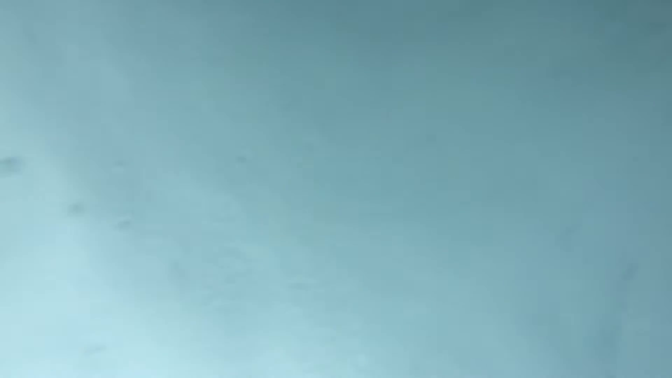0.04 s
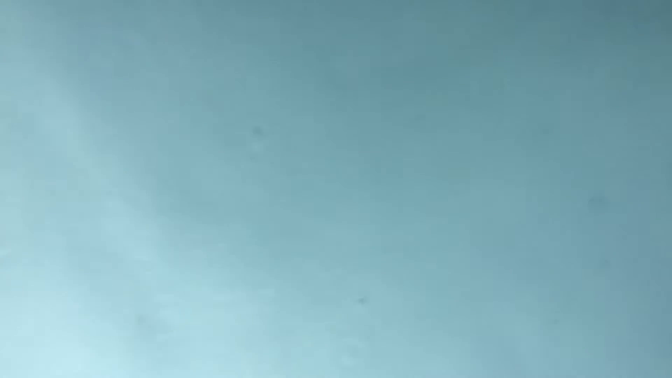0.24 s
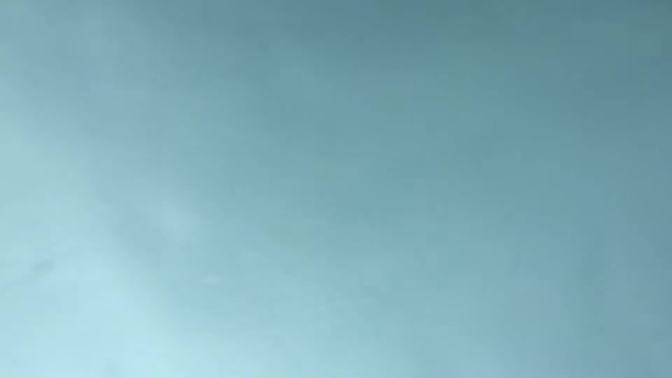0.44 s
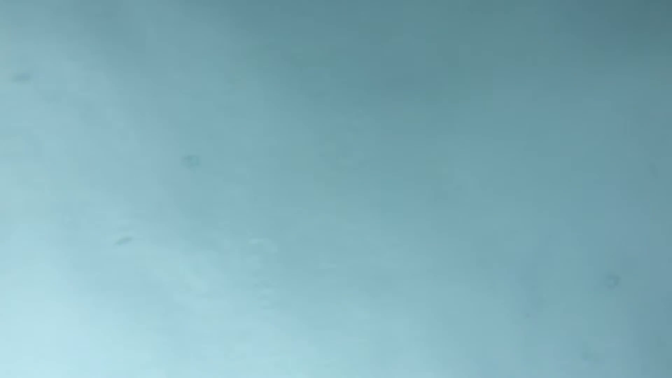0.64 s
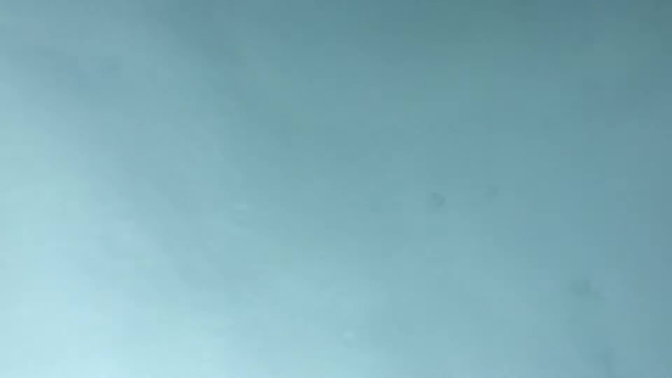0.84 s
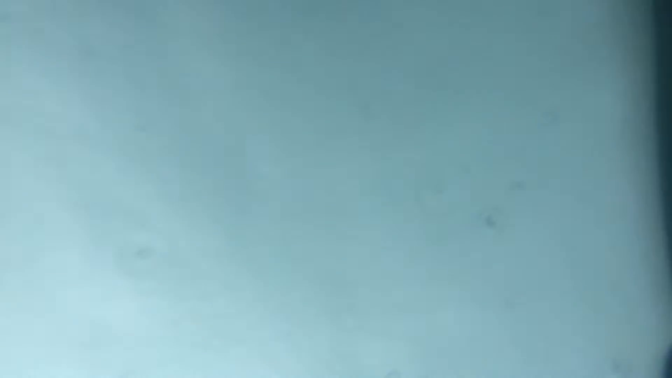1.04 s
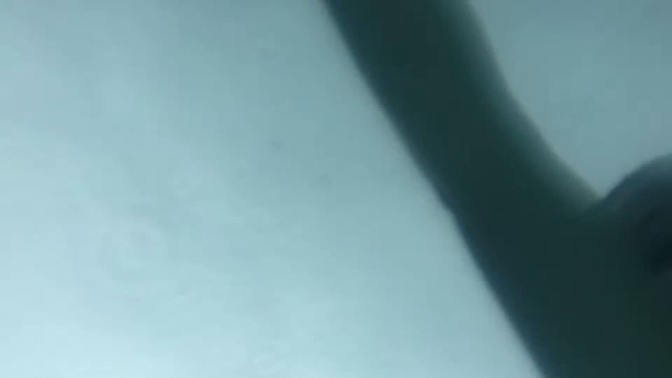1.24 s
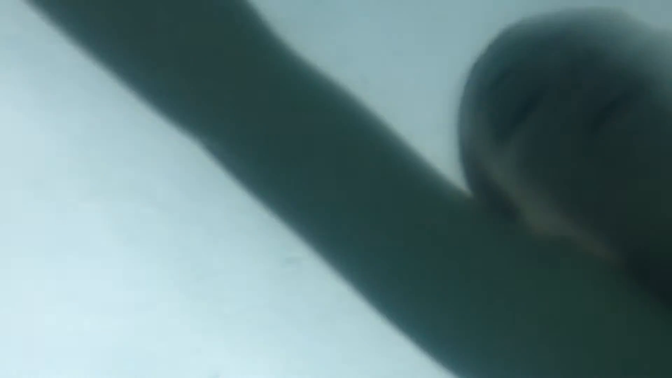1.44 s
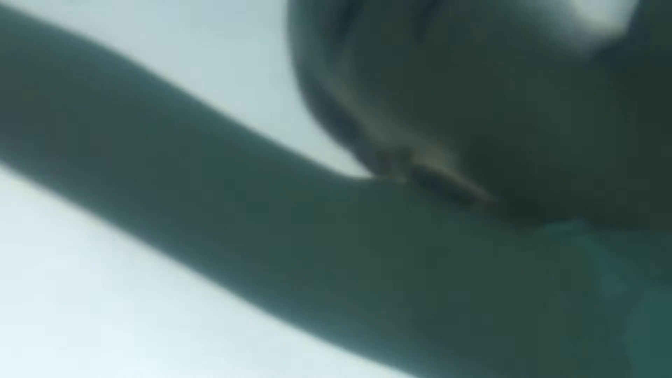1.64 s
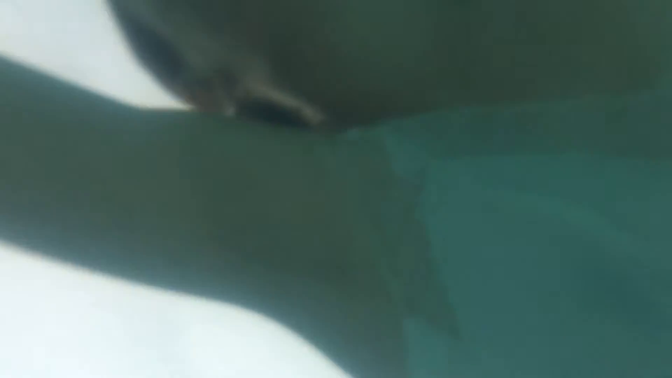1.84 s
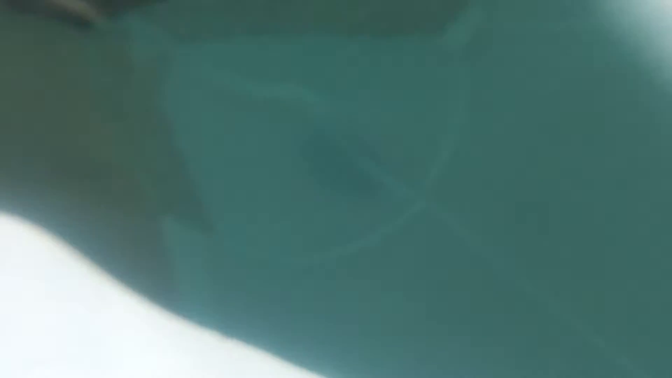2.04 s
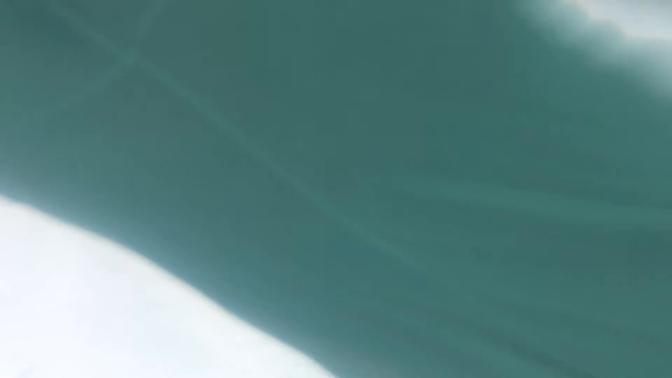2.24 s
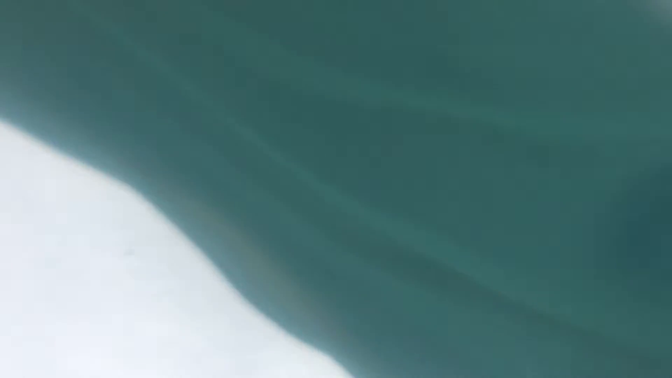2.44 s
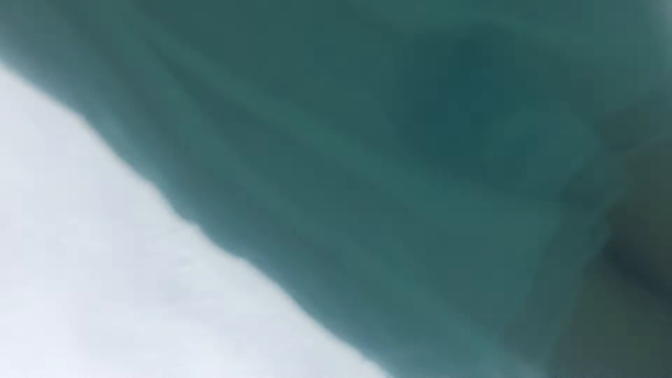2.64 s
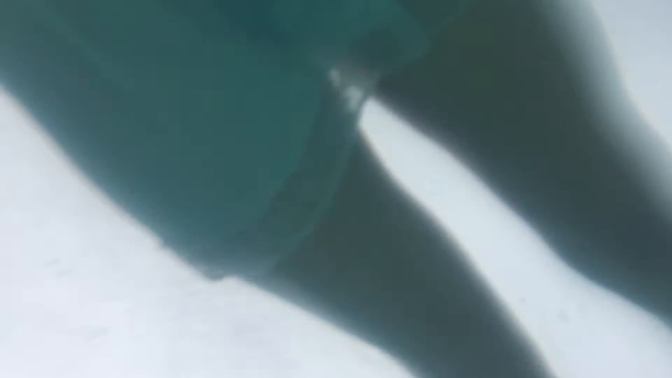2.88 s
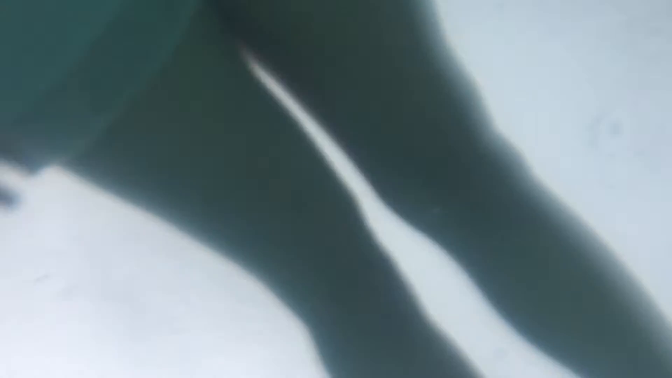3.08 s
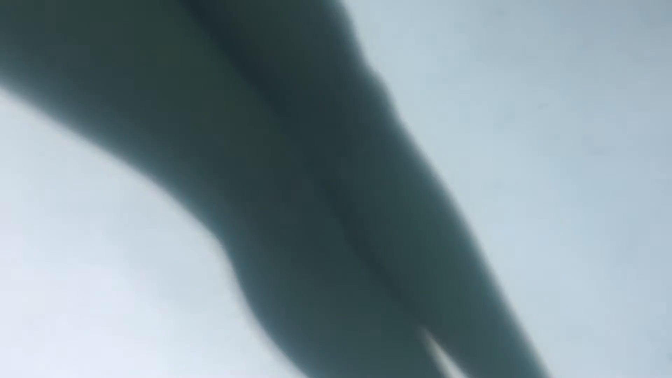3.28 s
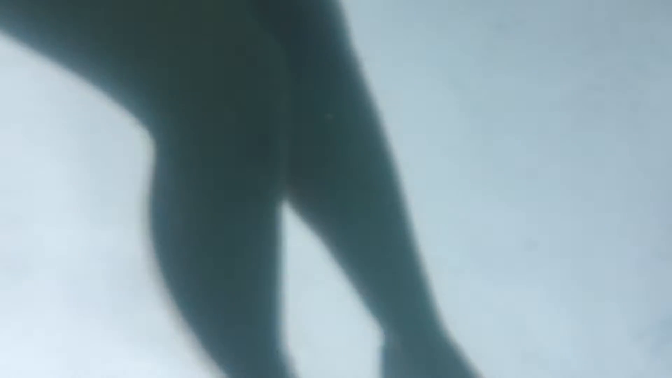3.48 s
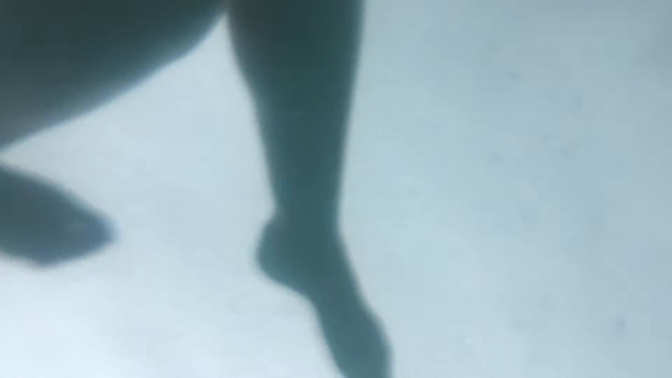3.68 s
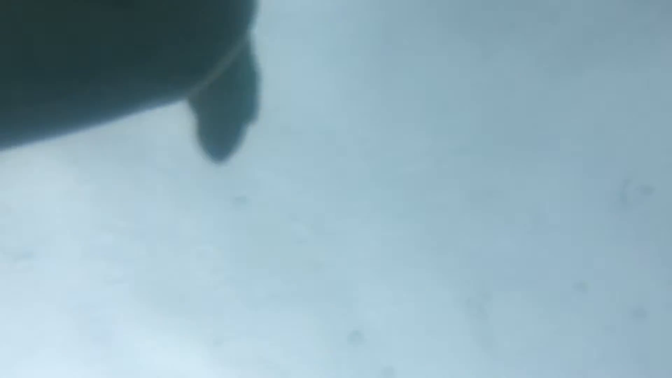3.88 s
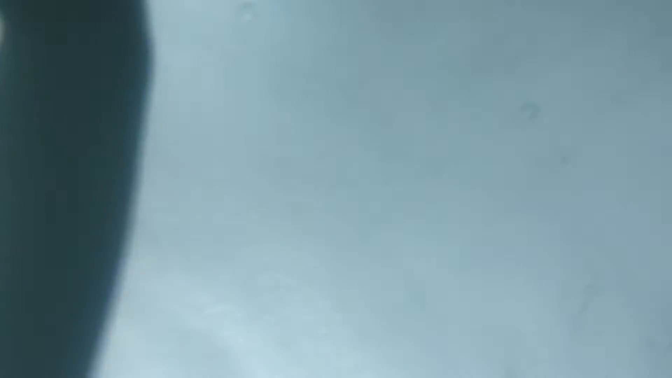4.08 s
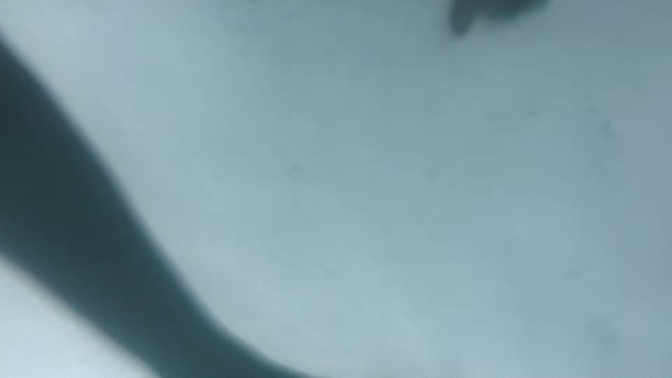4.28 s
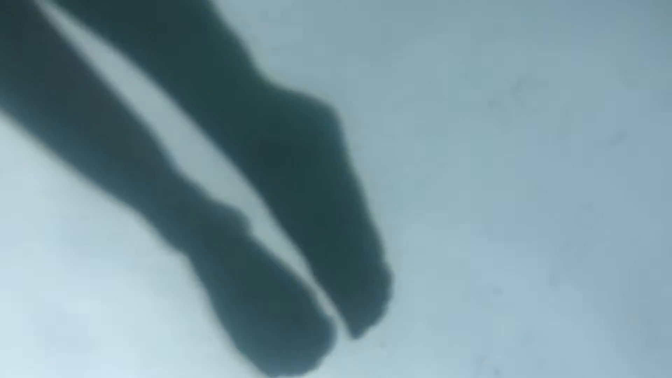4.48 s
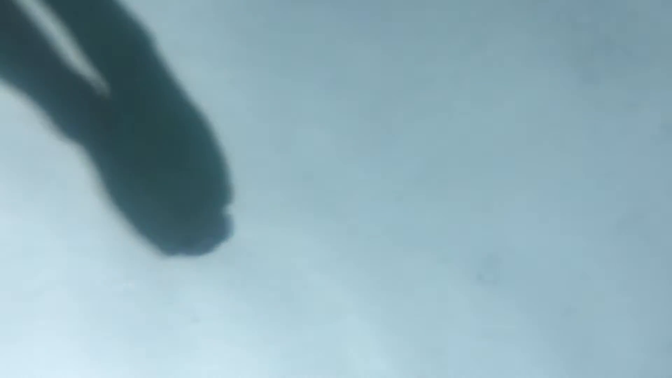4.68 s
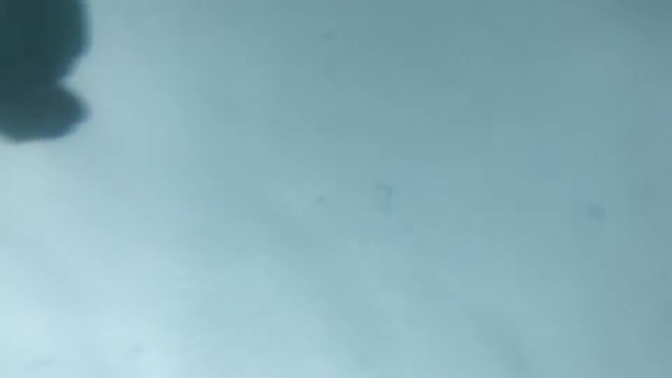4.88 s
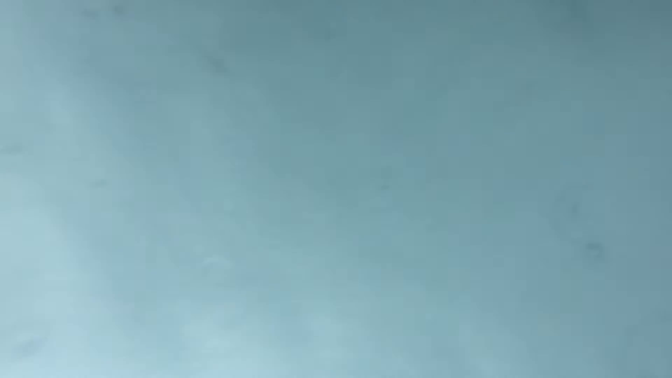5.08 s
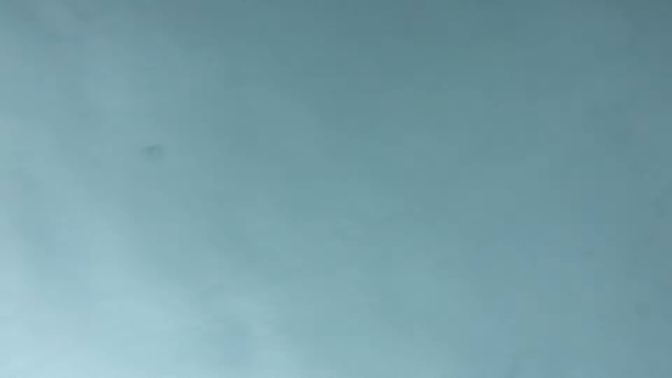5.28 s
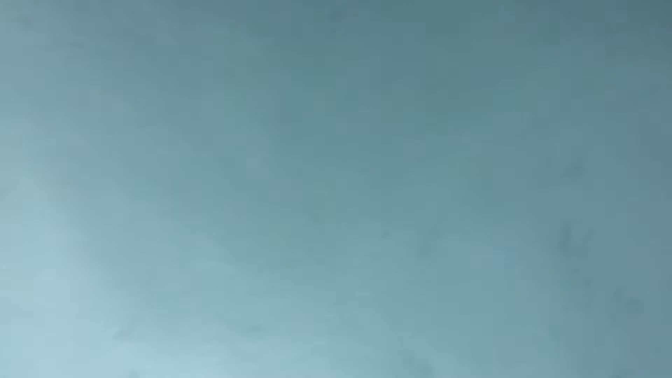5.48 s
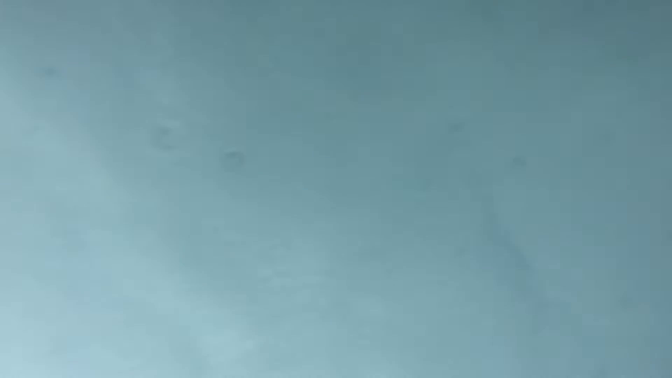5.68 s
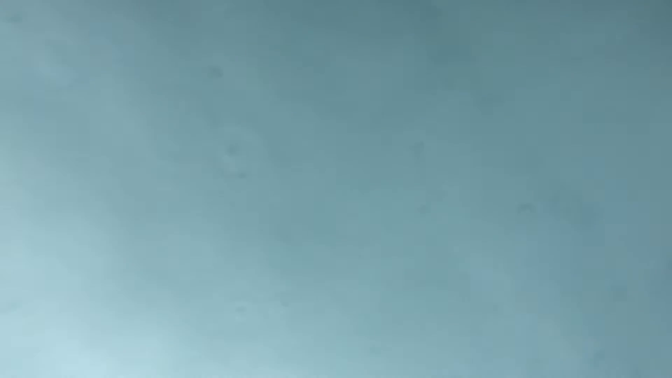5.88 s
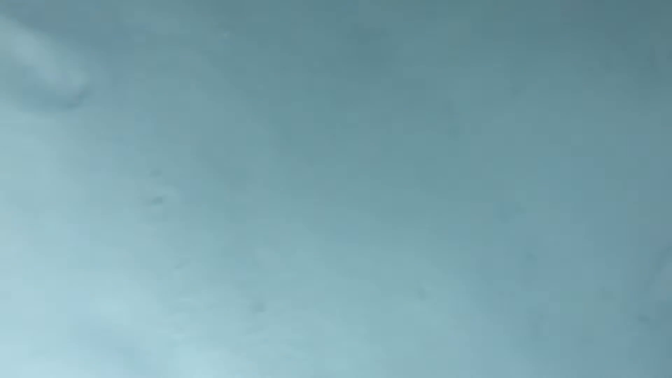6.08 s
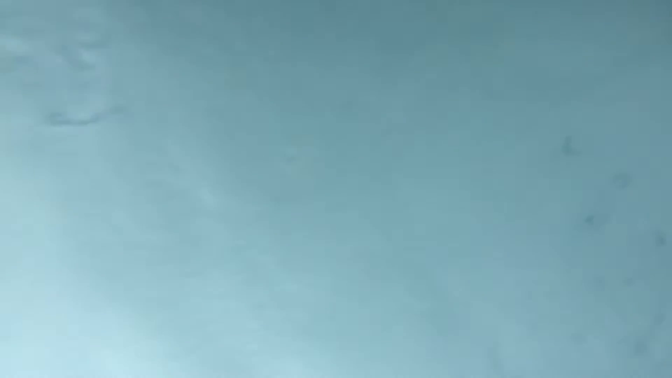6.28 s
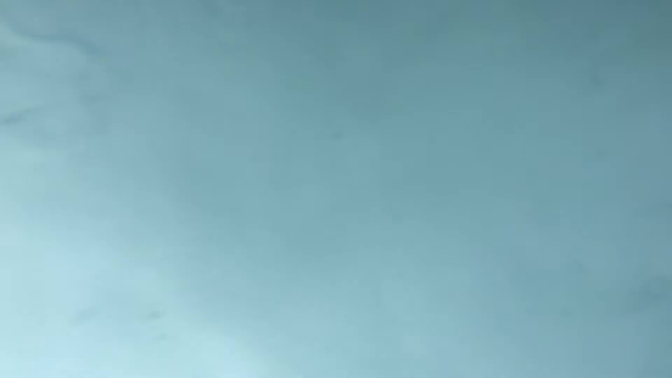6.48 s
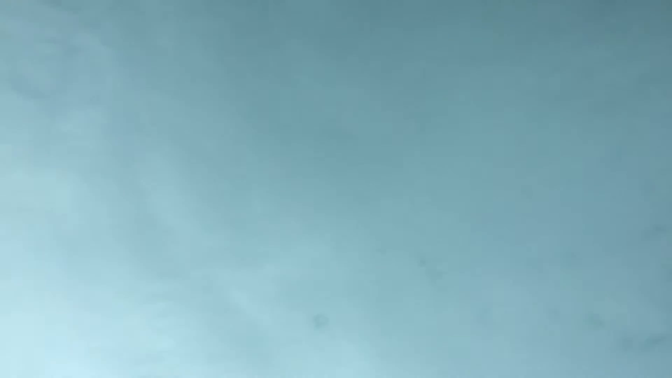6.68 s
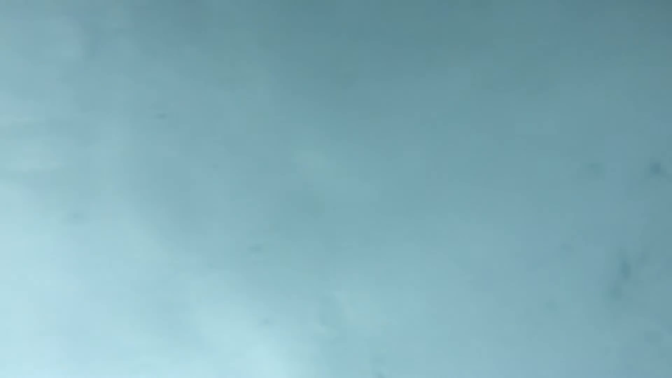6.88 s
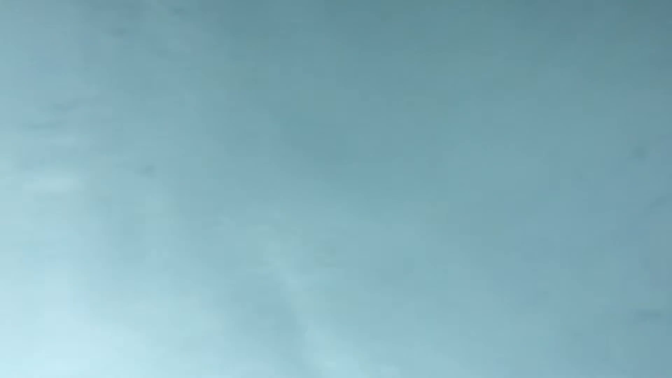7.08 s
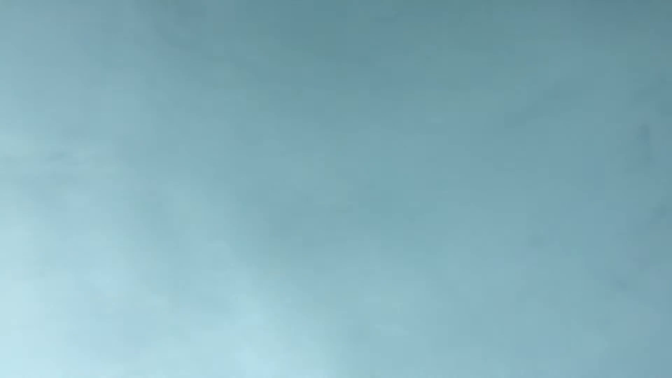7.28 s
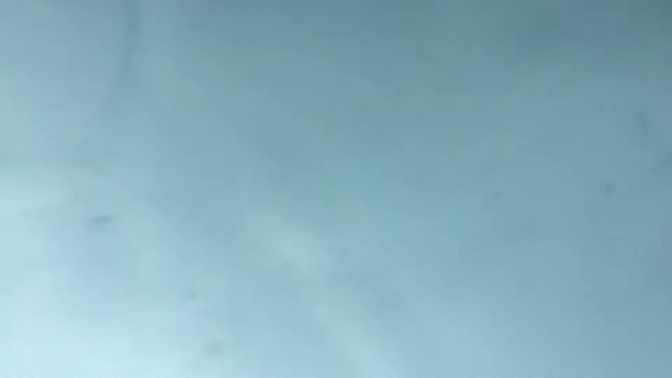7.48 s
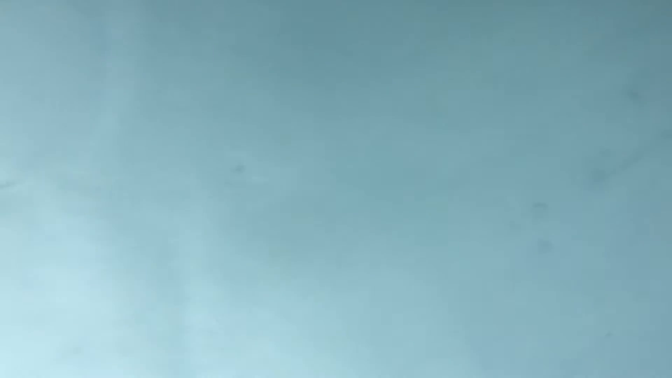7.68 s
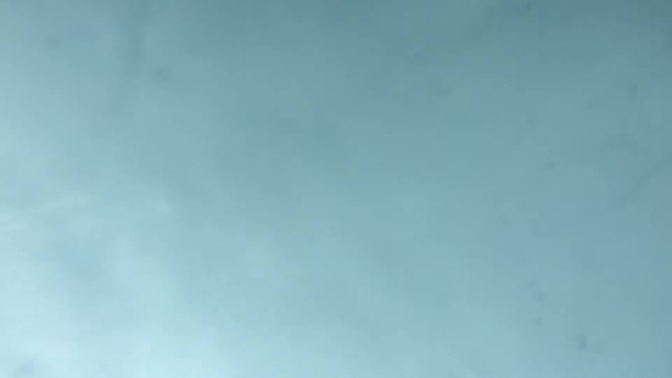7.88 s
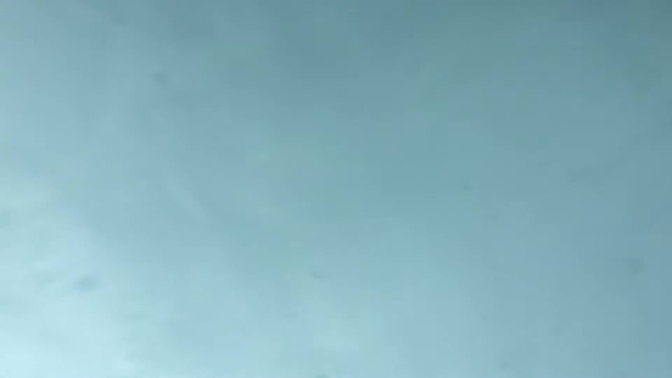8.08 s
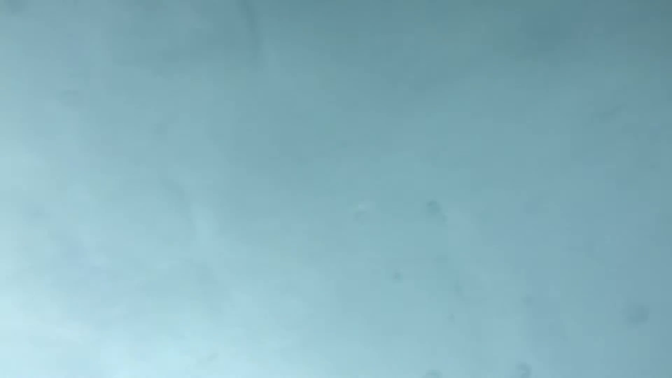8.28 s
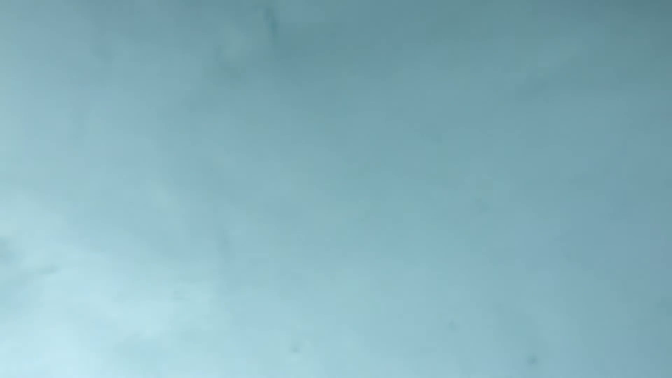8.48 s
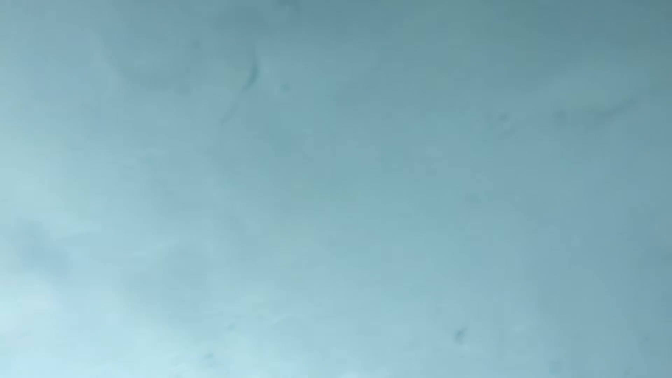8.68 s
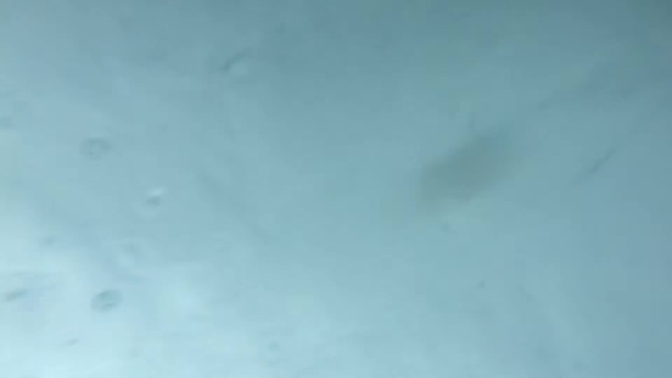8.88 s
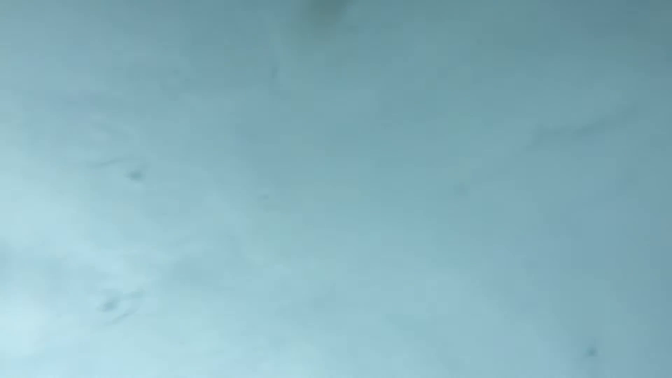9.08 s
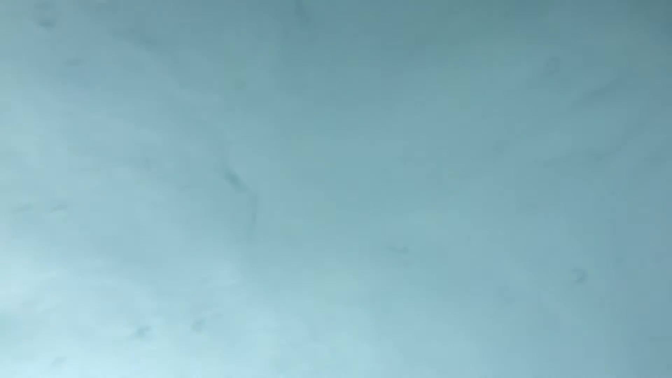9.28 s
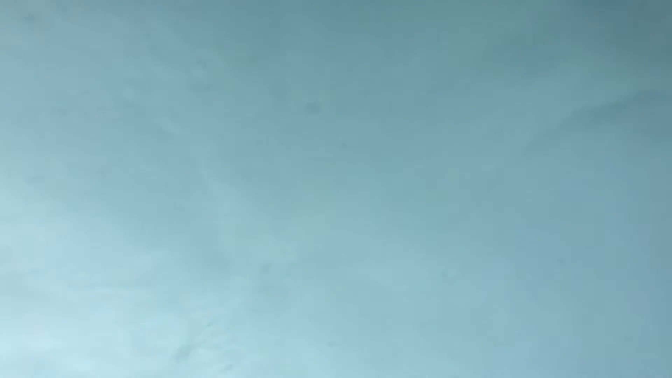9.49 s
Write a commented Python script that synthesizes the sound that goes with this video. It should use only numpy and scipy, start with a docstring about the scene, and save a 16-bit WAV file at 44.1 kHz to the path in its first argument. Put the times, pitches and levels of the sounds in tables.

```python
"""Under water in a swimming pool, a phone in a waterproof case is held while a swimmer glides past.
Eddies rumble as shaped noise and thump as short sinking tones; fingers knock and rub the case's ringing modes.
Bubbles ring as dying sines, alone, in splashes and as fizz, over the dull noise wash of the pool.
The phone's own electronics hiss, whine thinly and tick faintly twenty times a second."""
import sys
import numpy as np
from scipy import signal
from scipy.fft import rfft, irfft
from scipy.io import wavfile
from scipy.ndimage import uniform_filter1d

SR = 44100
rng = np.random.default_rng(int(sys.argv[2]) if len(sys.argv) > 2 else 0)


def log_audio(samples):
    """Write samples as a 16-bit WAV file to the path given in sys.argv[1]."""
    # one column per channel
    frames = np.atleast_2d(samples).T
    # limit to full scale, then quantise
    limited = np.clip(frames, -1, 1)
    pcm = np.round(limited * 32767).astype(np.int16)
    wavfile.write(sys.argv[1], SR, pcm)


N = 420713
TIME = np.arange(N) / SR

# water pushing past the case, before each layer's trim: (time [s], level [dB])
WATER_FLOW = [(0.0, -45), (0.69, -40.5), (1.03, -34), (2.15, -28), (3.77, -42), (4.06, -39.5), (6.4, -46),
              (6.54, -41.5), (8.32, -45.5), (9.54, -44)]
# sloshing of the pool, before each layer's trim: (time [s], level [dB])
POOL_SLOSH = [(0.0, -52.5), (0.37, -54.5), (0.87, -55.5), (1.97, -56.5), (2.28, -61), (3.37, -53.5),
              (5.71, -53.5), (6.27, -56.5), (6.51, -56), (9.54, -52.5)]


def amp(db):
    """Decibels to amplitude."""
    return 10 ** (np.asarray(db) / 20)


def evened(x):
    """Scale a signal to rms 1."""
    return x / np.sqrt(np.mean(x ** 2) + 1e-20)


def curve_db(points, at=TIME):
    """Level in dB along a breakpoint curve, straight between its points."""
    return np.interp(at, *np.transpose(points))


def add(mix, s, sound):
    """Lay a sound into the mix from second s, cut off where the mix ends."""
    part = mix[max(round(s * SR), 0):][:len(sound)]
    part += sound[:len(part)]


def noise(spectrum):
    """Steady noise of rms 1, its spectrum drawn through (frequency [Hz], relative level [dB])."""
    hz, db = np.transpose(spectrum)
    bins_hz = np.fft.rfftfreq(N, 1 / SR)
    gain = amp(np.interp(np.log(bins_hz + 1), np.log(hz), db))
    return evened(irfft(rfft(rng.standard_normal(N)) * gain, N))


def drift(per_s):
    """Random wander of rms 1: noise with a Gaussian treble roll-off around per_s Hz."""
    rolloff = np.exp(-(np.fft.rfftfreq(N, 1 / SR) / per_s) ** 2)
    return evened(irfft(rfft(rng.standard_normal(N)) * rolloff, N))


def ring(hz, t60, glide=0., onset=0.001):
    """A sine that fades by 60 dB in t60 seconds; its pitch may creep upward from hz."""
    t = np.arange(int(1.2 * t60 * SR) + 2) / SR
    tone = np.sin(2 * np.pi * hz * t * (1 + glide * t / t60))
    decay = np.exp(-np.log(1000) * t / t60)
    return tone * decay * (1 - np.exp(-t / onset))


def rumble(level_db=3, slow_db=-42, fast_db=-30):
    """Turbulence on the case; stronger flow sheds larger, deeper eddies."""
    # slow and fast flow: (frequency [Hz], relative level [dB])
    slow_spectrum = [(18, -40), (30, -29.5), (43, 9.5), (58, 0.5), (75, 2.5), (100, -9), (125, -9.5),
                     (165, -16), (210, -23.5), (300, -32.5), (420, -53), (900, -80.5)]
    fast_spectrum = [(18, -37), (28, -16), (38, 13), (52, 4.5), (72, -1), (100, -22), (125, -19),
                     (165, -31.5), (210, -41), (300, -37), (420, -51.5), (900, -130.5)]
    flow_db = curve_db(WATER_FLOW)
    fast = np.clip((flow_db - slow_db) / (fast_db - slow_db), 0, 1)
    turbulence = np.sqrt(1 - fast) * noise(slow_spectrum) + np.sqrt(fast) * noise(fast_spectrum)
    # the push of the water stays steady over several eddies (a quarter second)
    power = uniform_filter1d(turbulence ** 2, size=11000)
    return amp(flow_db + level_db) * turbulence / np.sqrt(power + 1e-9)


def thump(hz):
    """One push of water: its swell of about one cycle, and the tone under it sinking toward hz."""
    swell_cycles, sag = 1.056, .24
    # thumps near one deep pitch carry an overtone
    overtone_ratio, overtone_db, near_hz, width_octaves = 2.1, -10, 72, .5
    t = np.arange(SR // 3) / SR
    swell = swell_cycles / hz
    push = (t / swell * np.exp(1 - t / swell)) ** 2
    angle = 2 * np.pi * np.cumsum(hz * (1 + sag * np.exp(-t / swell))) / SR
    overtone = amp(overtone_db) * np.exp(-(np.log2(hz / near_hz) / width_octaves) ** 2)
    return push, push * (np.sin(angle) + overtone * np.sin(overtone_ratio * angle))


def thumps(churn_growth=0.64):
    """Eddies and bumps: each push swells and dies, sinking in pitch, and churns the water a little."""
    # (time [s], level [dB], pitch it sinks toward [Hz])
    pushes = [(.329, -25.5, 40), (0.703, -19.5, 79), (.922, -32.5, 156), (1.749, -25, 230),
              (1.77, -18.5, 50.3), (1.8243, -19.5, 253), (2.07, -26, 70), (2.266, -17.5, 54.5),
              (2.37, -30.5, 119), (2.589, -25.5, 179), (2.754, -22, 70), (3.2299, -35, 152),
              (3.368, -33, 152), (3.59, -31.5, 139), (3.995, -24, 70), (4.244, -23.5, 37),
              (4.319, -25, 41.7), (4.632, -32, 115), (5.1047, -28, 114), (6.11, -10.5, 118),
              (6.133, -4.5, 69.5), (6.136, -10, 114), (6.195, -26.5, 80), (6.235, -31, 70),
              (6.583, -30, 82.5), (6.856, -29.5, 124), (7.577, -31, 125)]
    churn_spectrum = [(100, -17.0), (180, 8.5), (300, -5), (380, -10), (600, -29.5), (1500, -69.0)]
    out, stir = np.zeros(N), np.zeros(N)
    for s, db, hz in pushes:
        push, tone = thump(hz)
        add(out, s, amp(db) * tone)
        add(stir, s, (amp(db) * hz / SR) ** churn_growth * push)
    return out + stir * noise(churn_spectrum)


def eddies(per_s=3, level_db=-2.5, spread_db=6, low_hz=105, high_hz=180):
    """Small stray eddies bump the case at random, harder in strong flow."""
    out = np.zeros(N)
    times = np.flatnonzero(rng.random(N) < per_s / SR) / SR
    for s, (size, weak) in zip(times, rng.random((len(times), 2))):
        db = curve_db(WATER_FLOW, s) + level_db - spread_db * weak
        hz = low_hz * (high_hz / low_hz) ** size
        add(out, s, amp(db) * thump(hz)[1])
    return out


def case_ring(bright_db, middle_hz=900):
    """The case struck once; brightness in dB per octave tilts its modes, as a harder contact does."""
    # modes of the case: (frequency before slight detuning [Hz], level before tilt [dB], t60 [s])
    modes = [(288, -7.5, 0.016), (534, 0, 0.028), (624, 1, 0.034), (800, 3, 0.017), (1095, -0.5, 0.025),
             (1260, 1, 0.0095), (1407, -4, 0.015), (1562, -14.5, 0.041), (2110, -19, 0.034),
             (2730, -18, 0.01), (3110, -22.5, 0.02), (4110, -24, 0.0088), (5500, -30.5, 0.0038),
             (7330, -37, 0.0047), (9150, -43, 0.0037)]
    body = np.zeros(SR // 16)
    for k, (hz, db, t60) in enumerate(modes):
        level = amp(db + bright_db * np.log2(hz / middle_hz))
        tone = ring(hz * rng.uniform(0.97, 1.03), t60, onset=.0001)
        add(body, 0, (-1) ** k * level * tone)
    return body


def knocks(grit=0.23):
    """A tap and a short gritty slip ring the modes of the case; a clean tap also flexes its wall and thuds."""
    # (time [s], peak of the ringing [dB], brightness [dB per octave], decay of the scuff [s])
    contacts = [(0.113, -37, -1, 0.011), (0.176, -34, 1, 0.012), (0.366, -31.5, -9.5, 0.015),
                (0.454, -28, 2, 0.0056), (0.69, -29, -4, 0.013), (0.919, -33.5, -8, 0.0011),
                (1.0383, -28.5, 6.5, 0.0047), (1.098, -34.5, 8, 0.016), (1.178, -35, 11.5, 0.00036),
                (1.747, -33, -16, .001), (1.898, -31, 3, 0.002), (2.551, -35, 3, 0.00036),
                (2.759, -38, 2, 0.0031), (3.638, -30, 1, 0.00093), (3.9528, -32.5, -2.5, 0.0048),
                (3.991, -25, -2, 0.0093), (4.228, -19.5, 1.5, 0.00032), (4.237, -18, 2.5, 0.0014),
                (4.683, -39.5, 4.5, 0.021), (6.104, -26, -6.5, .003), (6.138, -36, -2, .003),
                (6.552, -34.5, -5, 0.019)]
    # the thud weakens the longer the finger slips, and is deeper the harder it lands
    thud_db, thud_slip_s = -4.5, .0025
    thud_hz, thud_at_db, thud_octaves_per_db = 230, -23.5, .06
    out, t = np.zeros(N), np.arange(SR // 12) / SR
    for s, db, bright_db, scuff in contacts:
        force = grit * rng.standard_normal(len(t)) * np.exp(-t / scuff)
        force[0] += 1  # the tap itself
        knock = signal.fftconvolve(force, case_ring(bright_db))
        add(out, s, amp(db) * knock / abs(knock).max())
        thud = thump(thud_hz * 2 ** (thud_octaves_per_db * (thud_at_db - db)))[1]
        add(out, s, amp(db + thud_db) * np.exp(-scuff / thud_slip_s) * thud)
    return out


def rub(bright_db=6, grain_db=3, ring_share=0.6):
    """A finger slides over the case: fine friction noise, partly through the modes of the case."""
    # silent outside its points: (time [s], level [dB])
    slide = [(.89, -67), (.94, -57), (1.02, -67), (1.10, -60), (1.15, -66), (1.23, -62)]
    friction_spectrum = [(500, -10), (1100, 1), (1800, -10), (2800, -3),
                         (4400, -4), (5000, -11), (6500, -15.0), (9000, -35)]
    friction = noise(friction_spectrum) * amp(grain_db * drift(120))
    ringing = evened(signal.oaconvolve(friction, case_ring(bright_db))[:N])
    level = amp(np.interp(TIME, *np.transpose(slide), left=-np.inf, right=-np.inf))
    return level * evened(evened(friction) + ring_share * ringing)


def bubbles(twin_db=-10, twin_ratio=1.13, pocket_hz=275, pocket_t60=0.35):
    """Larger bubbles ring as they pinch off, each shedding a smaller twin; an air pocket hums low and long."""
    # single bubbles: (time [s], level [dB], starting pitch [Hz])
    singles = [(0.115, -33, 1220), (.160, -28, 617), (.183, -43, 1640), (.382, -33.5, 610),
               (.388, -40.5, 2545), (0.412, -36, 1110), (.544, -29.5, 1216), (0.62, -38, 1250),
               (1.039, -31, 1010), (1.6233, -38, 1172), (1.688, -34, 1365), (1.75, -27, 1016),
               (1.826, -12.5, 597), (1.8987, -27, 750), (1.914, -25.5, 594), (1.912, -45.5, 2000),
               (1.9775, -33.5, 604), (2.0179, -38, 820), (2.091, -37.5, 1196), (2.294, -43, 990),
               (2.878, -25, 809), (3.3795, -34, 901), (3.7043, -42, 2014), (4.237, -26, 1630),
               (4.465, -34, 2960), (5.069, -21, 1134), (5.361, -29, 1207), (5.484, -37.5, 1298),
               (5.534, -38.5, 1194), (9.038, -39, 1176)]
    # jolts of the trapped air pocket: (time [s], level [dB])
    jolts = [(0.117, -48), (.181, -36.5), (.285, -42.5), (.385, -33.5), (.454, -28.5)]
    # a bubble of the usual level rings for ring_cycles; harder-driven ones die sooner
    ring_cycles, usual_db, damping = 70.8, -35.5, 0.328
    out = np.zeros(N)
    for s, db, hz in singles:
        t60 = ring_cycles / hz * amp(damping * (usual_db - db))
        add(out, s, amp(db) * ring(hz, t60, glide=0.045, onset=0.0011))
        twin_s = s + rng.random() * t60 / 10
        add(out, twin_s, amp(db + twin_db) * ring(hz * twin_ratio, t60 / 2))
    for s, db in jolts:
        add(out, s, amp(db) * ring(pocket_hz, pocket_t60, onset=0.001))
    return out


def splashes(spread_octaves=0.315, cycles=28, glide=0.03, wall_hz=480):
    """Dozens of little bubbles of scattered size are born together in each splash."""
    # (middle [s], level before the wall [dB], middle pitch [Hz], length [s])
    clouds = [(0.233, -52.5, 720, 0.11), (0.295, -58.5, 1770, 0.046), (1.104, -47, 1426, 0.029),
              (3.397, -53, 890, 0.062), (3.908, -56, 1060, .03), (4.127, -60.5, 3200, 0.092),
              (4.475, -57.5, 3600, .08), (4.795, -41.5, 817, .12), (5.08, -42.5, 1100, 0.04),
              (5.06, -59.5, 2170, 0.055), (5.125, -50.5, 797, .09), (5.484, -61.5, 2330, .044),
              (5.601, -64, 1330, 0.34), (6.09, -61, 2600, .02), (6.572, -56.5, 837, .08),
              (9.048, -60, 1320, 0.088)]
    out = np.zeros(N)
    for s, db, hz, length in clouds:
        cloud = np.zeros(int((length + .08) * SR))
        for early, late, size, strength in rng.random(size=(90, 4)):
            pitch = hz * 2 ** (2 * spread_octaves * (2 * size - 1))
            loudness = strength ** 2 * np.sqrt(pitch / hz)
            # averaging two draws crowds the bubbles toward the middle
            add(cloud, length * (early + late) / 2, loudness * ring(pitch, cycles / pitch, glide))
        rms = np.sqrt(np.sum(cloud ** 2) / (length * SR))
        add(out, s - length / 2, amp(db) * cloud / rms)
    # the wall of the case shuts out the low notes
    wall = signal.butter(6, wall_hz, "highpass", fs=SR, output="sos")
    return signal.sosfilt(wall, out)


def snaps(length=0.00041):
    """Tiny bubbles burst right on the case as sharp bits of dying, bright noise."""
    # (time [s], level before the band filter [dB])
    bursts = [(.454, -42), (1.178, -31), (4.241, -46), (4.454, -43), (4.498, -42), (8.296, -46)]
    out, t = np.zeros(N), np.arange(300) / SR
    for s, db in bursts:
        add(out, s, amp(db) * rng.standard_normal(len(t)) * np.exp(-t / length))
    band = signal.butter(2, [4500, 10500], "bandpass", fs=SR, output="sos")
    return signal.sosfilt(band, out)


def fizz(level_db, low_hz, high_hz, per_s, cycles, spread_db, clumping, pop=1.2, twin=0.48):
    """Stray small bubbles come in clumps, and are louder while the pool sloshes."""
    out, pitches = np.zeros(N), np.geomspace(low_hz, high_hz, num=120)
    busy = np.exp(clumping * drift(14))
    births = np.flatnonzero(rng.random(N) < per_s / SR * busy / busy.mean())
    # a stock of bubbles, one for each pitch
    rings = np.zeros((len(pitches), SR // 20))
    for one, hz, (damping, twin_size, lag) in zip(rings, pitches, rng.random((len(pitches), 3))):
        add(one, 0, ring(hz, cycles / hz * (.5 + damping), glide=0.021, onset=0.0018))
        add(one, 0, pop * ring(hz, 8 / hz, onset=.0003))  # the brief pop of pinching off
        add(one, .006 * lag, twin * ring(hz * 2 ** (twin_size - .5), cycles / hz / 2))
    for n, (a, b, loud) in zip(births, rng.random((len(births), 3))):
        boost_db = spread_db * min(-np.log(loud), 3)  # a few stand out
        add(out, n / SR, amp(boost_db) * rings[int((a + b) / 2 * len(rings))])
    return amp(level_db) * evened(out * amp(curve_db(POOL_SLOSH) / 2))


def pool(x, wet_db, t60):
    """The surface and the walls return a short scatter of echoes."""
    t = np.arange(SR // 4) / SR
    hits = rng.standard_normal(len(t)) * (rng.random(len(t)) < 2500 / SR)  # 2500 echoes per second
    taps = hits * np.exp(-np.log(1000) * t / t60) * (t > .003)
    return x + amp(wet_db) * signal.oaconvolve(x, taps / np.linalg.norm(taps))[:N]


def wash(level_db=-0.25, flutter_db=1.95):
    """Far sloshing, muffled by the case: dull noise with a fluttering level."""
    # (frequency [Hz], relative level [dB])
    wash_spectrum = [(150, -3.5), (300, -6), (400, -8.5), (470, -7), (550, 4.5), (680, 1.5), (920, -3.5),
                     (1200, -2), (1450, -12), (1800, -21), (2400, -24), (4500, -37.5), (9000, -40.5)]
    return amp(curve_db(POOL_SLOSH) + level_db + flutter_db * drift(34)) * noise(wash_spectrum)


def electronics(hiss_db=-70, tick_db=-49.5, second_db=-4, second_share=0.94, vary_db=1.1):
    """Steady hiss, spells of brighter hiss, and a regular noise tick that often comes double."""
    # steady hiss: (frequency [Hz], relative level [dB])
    hiss_spectrum = [(1000, 12), (2500, 4), (4300, 4.5), (4900, -0.5), (5600, 3), (7600, 2), (9500, -8),
                     (10400, -7), (15800, -7.5)]
    # brighter hiss: (start [s], end [s], level [dB])
    spells = [(2.08, 2.688, -68), (6.142, 6.403, -71), (6.395, 6.56, -64.5)]
    out = amp(hiss_db) * noise(hiss_spectrum)
    bright = noise([(2000, 7.5), (6000, -2.0), (9600, 0.0), (11000, -3), (15800, -4)])
    for start, end, db in spells:
        out += amp(db) * bright * ((TIME > start) & (TIME < end))
    first_s, period_s = .0329, .0500045
    ticks, t = np.zeros(N), np.arange(200) / SR
    for s in np.arange(first_s, TIME[-1], period_s):
        level = amp(vary_db * rng.standard_normal())
        spark = rng.standard_normal((2, len(t))) * np.exp(-t / 0.001) * level
        add(ticks, s, spark[0])
        has_second = rng.random() < second_share
        add(ticks, s + rng.uniform(0.0032, 0.014), amp(second_db) * spark[1] * has_second)
    band = signal.butter(3, [2600, 8600], "bandpass", fs=SR, output="sos")
    return out + amp(tick_db) * signal.sosfilt(band, ticks)


def whine(level_db=-88, hz=10000, width_hz=240):
    """A thin, unsteady high note in the phone: a sine under a fast random wander."""
    return amp(level_db) * evened(drift(width_hz) * np.sin(2 * np.pi * hz * TIME))


def scene():
    """Water and hands on the case, bubbles with their echoes, the wash, and the phone itself."""
    fine = fizz(level_db=-71.5, low_hz=1808, high_hz=5670, per_s=90, cycles=43, spread_db=6.5, clumping=.8)
    coarse = fizz(level_db=-64.5, low_hz=816, high_hz=1490, per_s=99, cycles=12, spread_db=4, clumping=0.46)
    near = pool(knocks() + bubbles() + splashes(), wet_db=-12, t60=0.076)
    far = pool(fine + coarse, wet_db=-6, t60=0.041)
    on_case = rumble() + thumps() + eddies() + rub() + snaps()
    return (on_case + near + far + wash() + electronics() + whine())[None]


def record(dry, edge_hz=15900):
    """The band limit of the phone: a steep low-pass."""
    lowpass = signal.firwin(511, edge_hz, window=("kaiser", 9), fs=SR)
    return signal.oaconvolve(dry, lowpass[None], "same")


dry = scene()
out = record(dry)
log_audio(out)
```